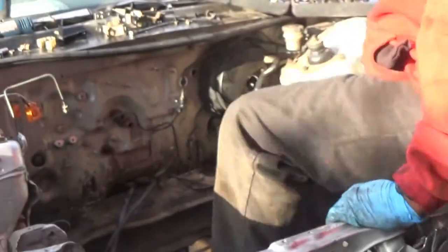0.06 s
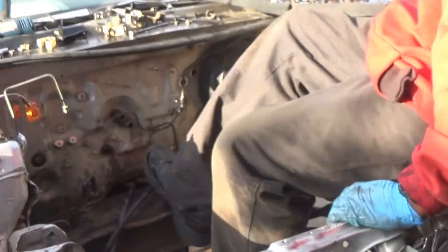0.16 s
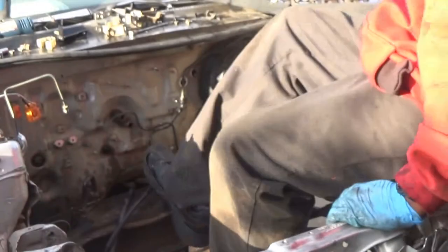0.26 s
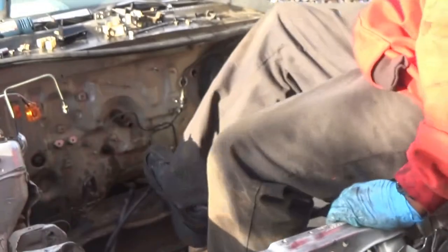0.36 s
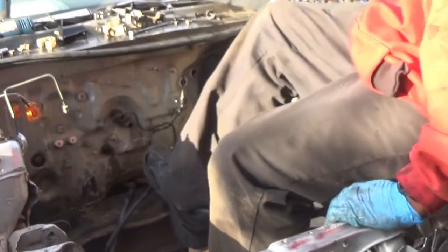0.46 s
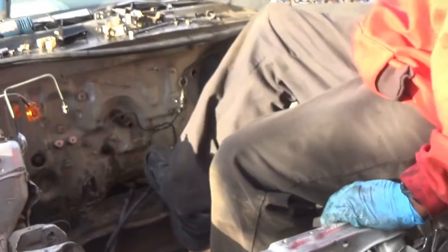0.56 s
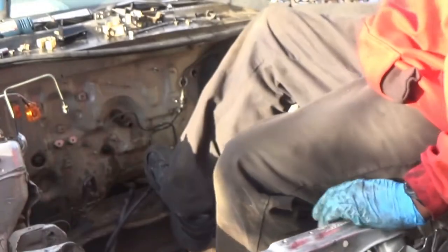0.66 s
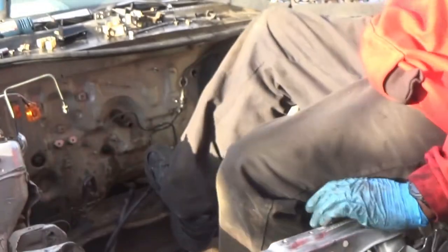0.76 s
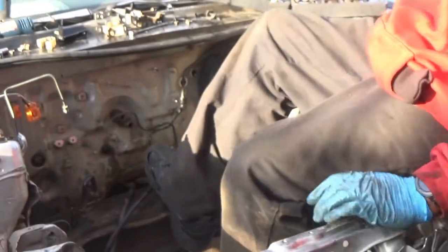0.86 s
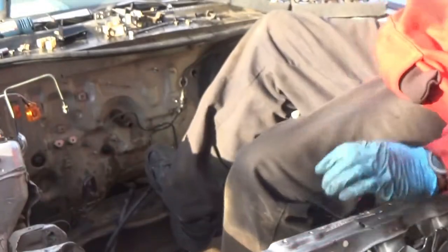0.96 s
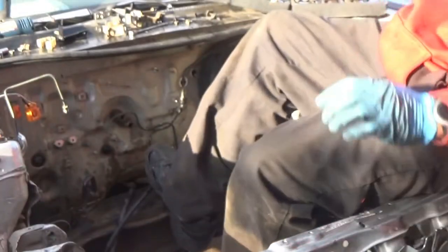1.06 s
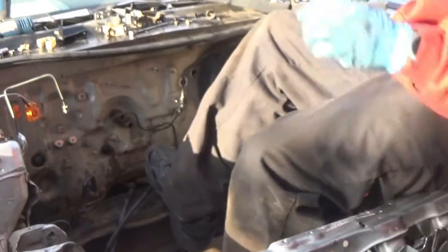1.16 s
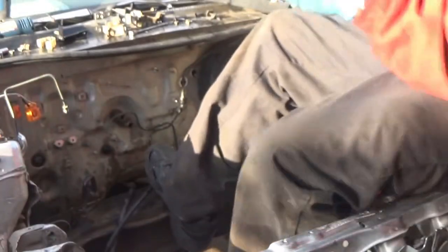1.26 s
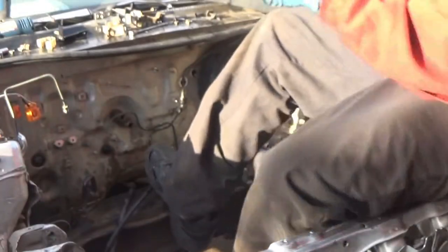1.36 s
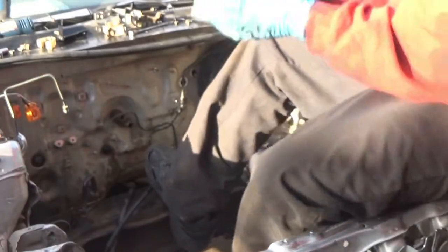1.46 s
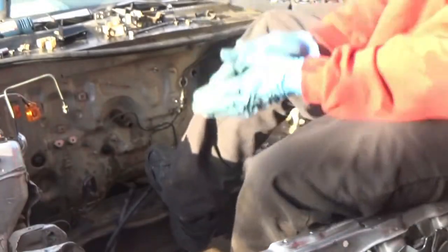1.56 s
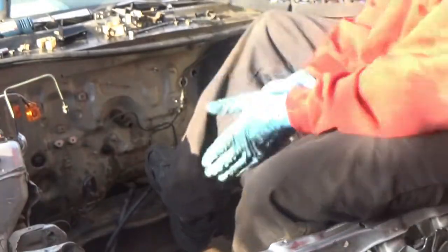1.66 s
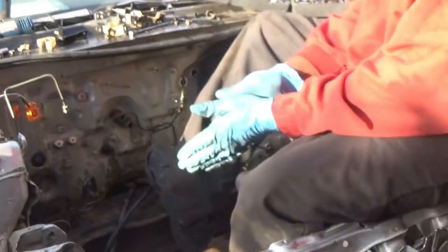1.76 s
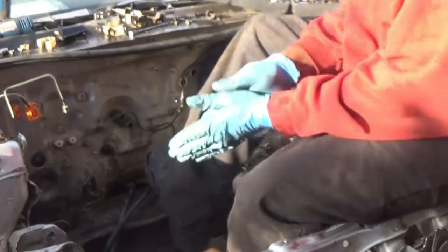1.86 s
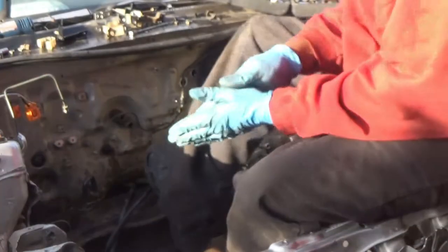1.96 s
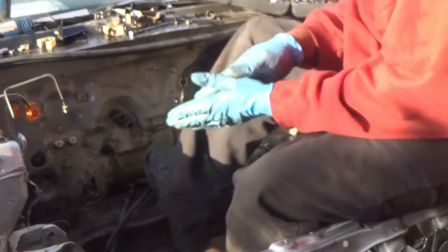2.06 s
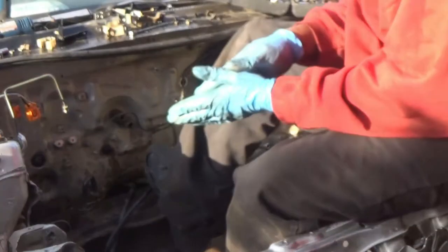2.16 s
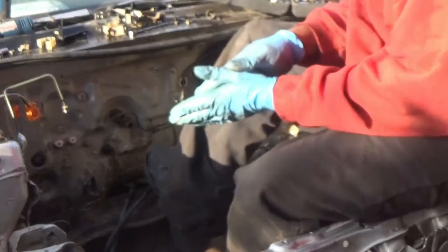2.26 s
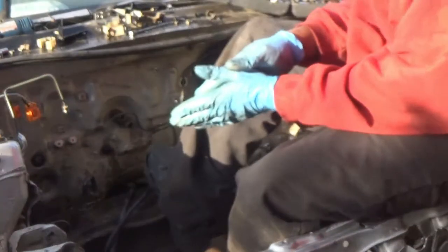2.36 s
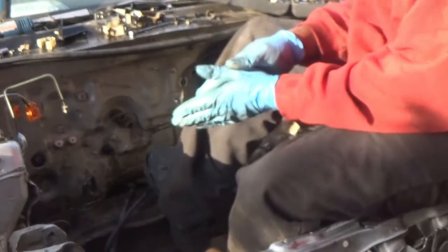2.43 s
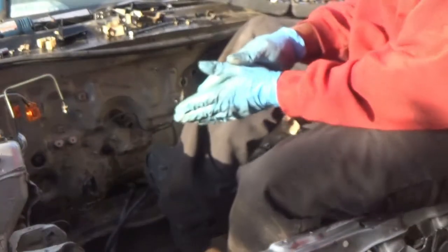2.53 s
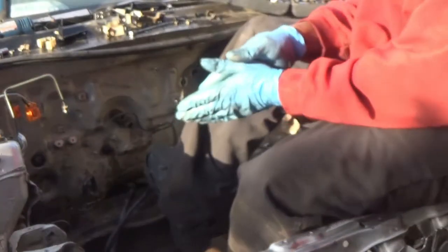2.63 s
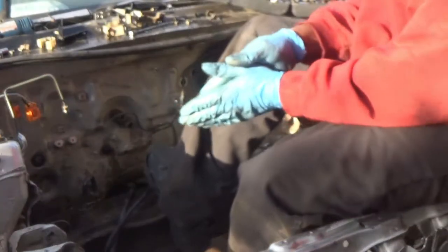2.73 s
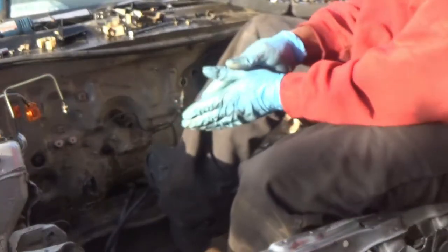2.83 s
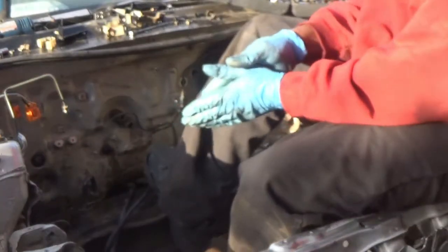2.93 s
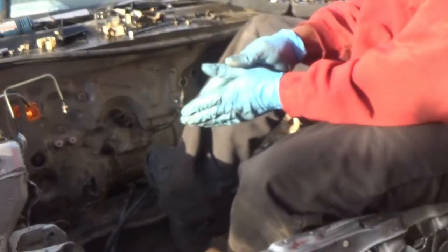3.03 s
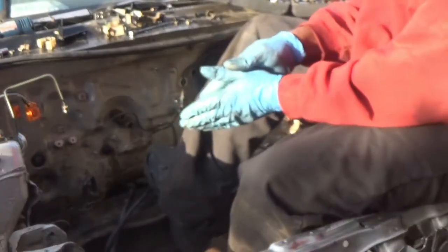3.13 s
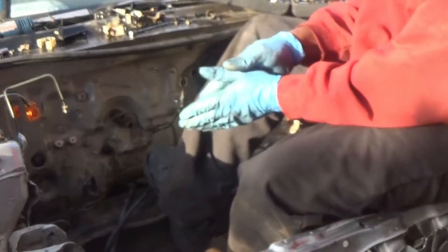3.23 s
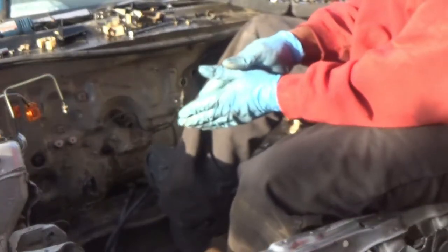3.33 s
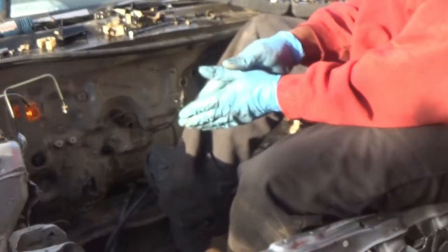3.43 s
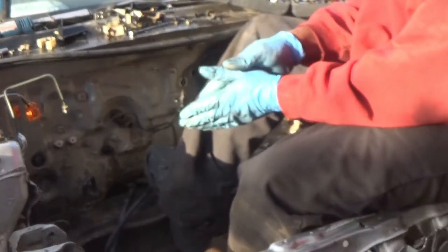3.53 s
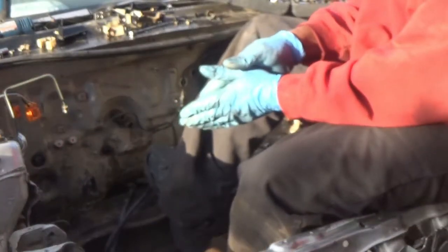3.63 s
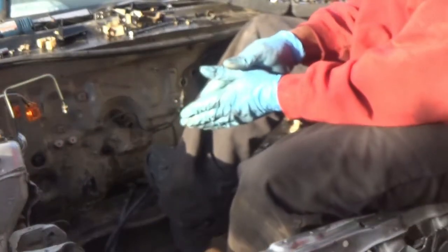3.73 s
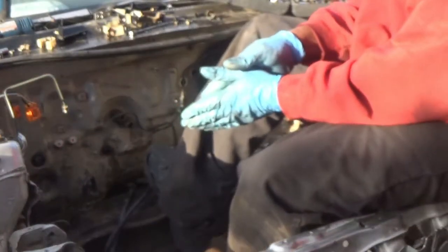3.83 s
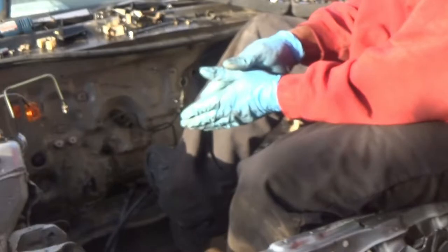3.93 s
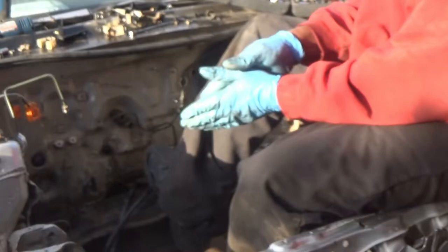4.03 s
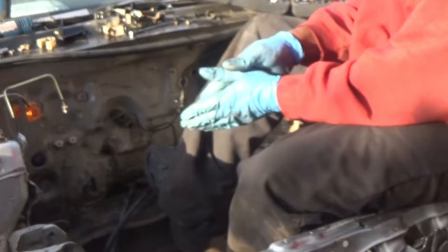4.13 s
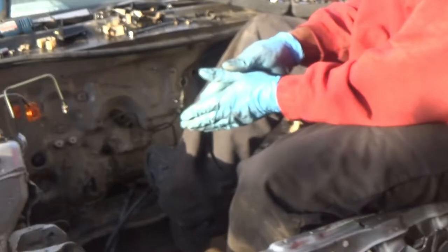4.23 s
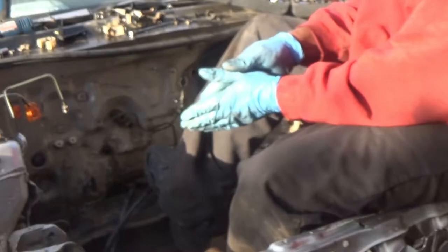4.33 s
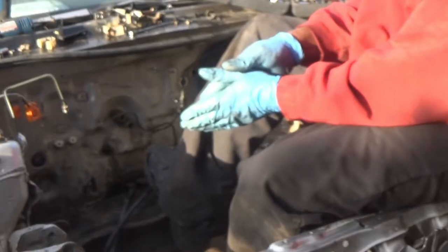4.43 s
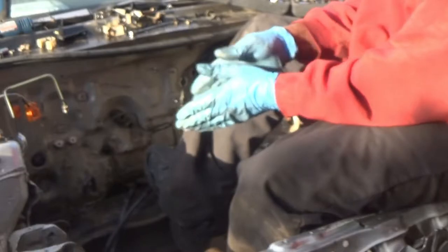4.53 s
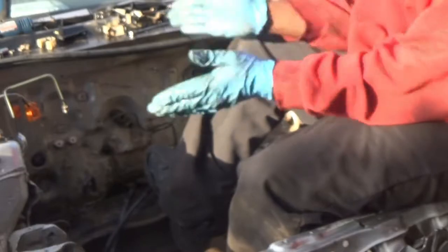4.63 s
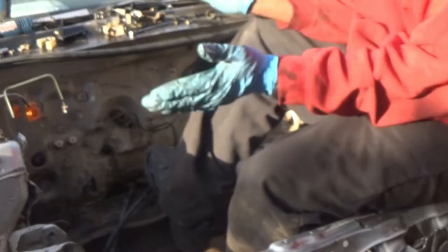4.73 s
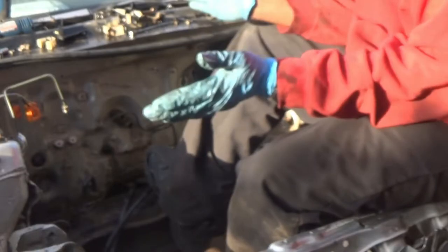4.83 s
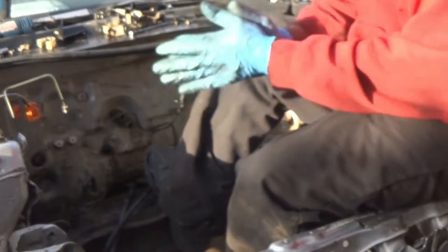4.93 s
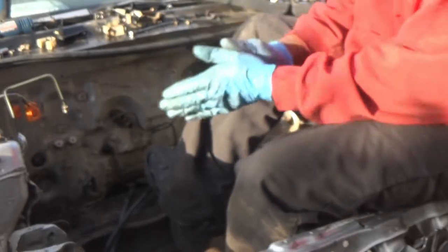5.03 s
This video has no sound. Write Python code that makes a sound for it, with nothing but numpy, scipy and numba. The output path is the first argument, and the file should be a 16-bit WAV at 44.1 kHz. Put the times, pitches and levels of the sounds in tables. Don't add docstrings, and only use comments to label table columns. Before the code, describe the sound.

After a very short silence, an outdoor yard cuts in: low distant hum, chirping birds and a faint fluttering lens-motor whine. Clothing and rubber gloves scuff close by for about two seconds, then nearly stop. A soft tug leads into sharp rubber cracks, followed by a single hard clap with a bright, rattling metallic tail, far louder than everything else.

```python
import sys
import numpy as np
from scipy import signal
from scipy.io import wavfile
from scipy.ndimage import uniform_filter1d
from numba import njit

SR = 44100
rng = np.random.default_rng(int(sys.argv[2]) if len(sys.argv) > 2 else 0)


def bounce(signal):
    frames = np.transpose(np.atleast_2d(signal))
    limited = np.clip(frames, -1, 1)
    pcm = np.round(limited * 32767).astype(np.int16)
    wavfile.write(sys.argv[1], SR, pcm)


def attenuation_scalar(level_db):
    decades = np.asarray(level_db, float) / 20
    return 10 ** decades


N = 224403


@njit
def svf(x, hz, width):
    y, b, l = np.empty(len(x)), 0., 0.
    g, k = np.tan(np.pi * hz / SR), width / hz
    for i in range(len(x)):
        v = (b + g * (x[i] - l)) / (1 + g * (g + k))
        b, l, y[i] = 2 * v - b, l + 2 * g * v, k * v
    return y


def band(x, hz, width):
    hz, width = float(hz), float(width)
    return svf(svf(x, hz, width), hz, width)


def unit(x):
    return x / np.sqrt(np.mean(x ** 2))


def at(table, hz):
    f, v = np.transpose(table)
    return np.interp(np.log(hz), np.log(f), v)


def walk(rate_hz):
    k = int(SR / rate_hz)
    steps = np.repeat(rng.standard_normal(N // k + 1), k)
    return 1.195 * uniform_filter1d(uniform_filter1d(steps, k), k)[:N]


def add(out, s, x, pan_db):
    i = int(s * SR)
    x = x[:N - i]
    out[:, i:i + len(x)] += x * attenuation_scalar(np.array([[pan_db], [-pan_db]]) / 2)


def burst(db, hz, width, t60):
    t = np.arange(4096) / SR
    puff = rng.standard_normal(len(t)) * 1000. ** (-t / t60)
    x = band(puff, min(hz, .4 * SR), 1.6 * width)
    return attenuation_scalar(db) * x / abs(x).max()


def spread(x, side_db):
    smear = uniform_filter1d(rng.standard_normal(600), size=3) * np.exp(-np.arange(600) / 150)
    side = signal.fftconvolve(x, smear / np.linalg.norm(smear))[:N] * attenuation_scalar(side_db)
    return np.array([x + side, x - side])


def effort(moves, hz):
    t = np.arange(N) / SR
    power = 0
    for s, rise, fall, db, tilt in moves:
        below_db = 10 * np.maximum((s - t) / rise, (t - s) / fall)
        power = power + attenuation_scalar(db + tilt * np.log2(hz / 2500) - below_db) ** 2
    return power


# f/Hz, width/Hz
SURFACES = [(750, 1000), (2500, 1870), (5000, 2100), (10500, 4900)]
# peak t/s, rise/s, fall/s, level/dB, brightness/(dB/octave)
SHIFTS = [(.235, 0.019, .03, -56, -1.5), (.342, 0.041, 0.044, -49.5, 0), (.418, .03, 0.044, -48.5, -2.5),
          (.68, .07, 0.18, -55, 0), (.934, .05, .06, -57.5, 1), (1.18, 0.15, 0.054, -60.5, 1.5),
          (1.256, .08, 0.1, -51.5, 0), (1.37, .05, .06, -57.5, -0.5), (1.466, .02, 0.098, -54.5, -0.5),
          (1.606, 0.11, 0.07, -53, 0.5), (1.75, 0.058, 0.084, -51.5, 0), (1.9, .05, 0.088, -59.5, -1),
          (2.03, .08, .04, -60.5, 1), (2.14, .03, .012, -64, -0.5)]
SHIFT_DB = (0, -9, -4, -7)
# peak t/s, rise/s, fall/s, level/dB, brightness/(dB/octave)
RUBS = [
    (.38, .08, 0.094, -52, 2),
    (1.1, 0.13, .08, -61.5, -3),
    (1.256, .05, .07, -47.5, 3),
    (1.48, 0.023, .04, -55, -3),
    (1.606, 0.087, 0.07, -41.5, -2),
]
RUB_DB = (-18, 0, -21, -16)
# t/s, peak level/dB, f/Hz, left minus right/dB
TICKS = [(0.245, -44, 8000, 5), (0.346, -43, 1810, 0), (.42, -48, 1900, -6), (0.618, -44.5, 1850, 3),
         (1.23, -34, 2800, -3), (1.3185, -36.5, 10000, 3), (1.324, -39, 10000, 0), (1.337, -42, 9000, 0),
         (1.46, -47, 5000, 0), (1.511, -44, 11000, 0), (1.6, -34, 11100, -1), (1.643, -54, 11000, 0),
         (2.257, -51, 6500, 0), (2.508, -43, 2370, 2), (2.515, -52, 3780, 0), (2.53, -48, 2780, 3),
         (2.601, -54, 4100, 0), (4.325, -56, 3000, 0)]


def rustle():
    sizes = attenuation_scalar(1.5 * rng.exponential(size=N))
    grit = sizes * (rng.random(N) < .3) * attenuation_scalar(1.5 * walk(60.))
    out = 0
    for (hz, width), shift_db, rub_db in zip(SURFACES, SHIFT_DB, RUB_DB):
        grains = unit(band(grit * rng.standard_normal(N), hz, 1.55 * width))
        power = attenuation_scalar(2 * shift_db) * effort(SHIFTS, hz) + attenuation_scalar(2 * rub_db) * effort(RUBS, hz)
        out = out + grains * np.sqrt(power)
    rubbed = spread(out, side_db=-14) * attenuation_scalar(np.array([[.22], [-.22]]))
    for s, db, hz, pan_db in TICKS:
        add(rubbed, s, burst(db, hz, 0.49 * hz, t60=min(.03, 40 / hz)), pan_db)
    return rubbed


# t/s, length/s, level/dB, f/Hz, width/Hz
SWISHES = [(1.511, .15, -44.5, 3260, 2200), (1.449, 0.31, -57.5, 376, 250), (.3, 0.19, -59, 280, 200),
           (2.1, .6, -80, 9000, 9000), (2.265, 0.066, -64.5, 5300, 1500), (2.492, 0.075, -57, 2900, 2500),
           (2.564, .1, -64, 4150, 1200), (2.893, 0.093, -60.5, 5000, 2200), (3.865, 0.075, -65, 5200, 1800),
           (4.343, 0.045, -53, 3540, 2500), (4.58, 0.11, -58, 4770, 2200), (4.798, 0.27, -65, 5500, 6000)]


def swish():
    out = np.zeros((2, N))
    for s, length_s, db, hz, width in SWISHES:
        n = int(length_s * SR)
        brush = band(rng.standard_normal(n), hz, 0.83 * width)
        add(out, s, attenuation_scalar(db) * unit(brush) * np.hanning(n), 0)
    return spread(out[0], side_db=-15.5)


# level/dB, f/Hz, width/Hz
TUG = [(-41.5, 3000, 1300), (-39, 2770, 500), (-44.5, 4000, 1100), (-52, 7100, 2100)]
# t/s, peak level/dB, f/Hz
CRACKS = [(4.5011, -39, 8000), (4.5035, -30, 5500), (4.5067, -21, 6460), (4.5085, -20.5, 10550),
          (4.5093, -16.5, 5200), (4.5107, -17, 5000), (4.511, -20, 8500), (4.5152, -21, 8600),
          (4.518, -23, 4960), (4.5206, -30, 6000)]
# level/dB, f/Hz, width/Hz, t60/s
SNAP = [(-36.5, 1040, 760, 0.19), (-34.5, 2250, 1000, 0.075), (-33.5, 5800, 6000, .19)]


def snap():
    out = np.zeros((2, N))
    for k, part in enumerate(TUG):
        add(out, 4.345 + k * 0.0044, burst(*part, t60=0.074), 0)
    for s, db, hz in CRACKS:
        add(out, s, burst(db, hz, 0.43 * hz, t60=.016), 0)
    for part in SNAP:
        add(out, 4.51, burst(*part), 0)
    return spread(out[0], side_db=-16.5) * attenuation_scalar(np.array([[-.6], [.6]]))


# t/s, peak level/dB, cupped palm over flat fingers/dB, left minus right/dB
CLAP = [(4.9407, -23, 0, -5), (4.9421, -10, 11, 3.5), (4.9433, -9, -9.5, 3), (4.945, -19, 7, 1),
        (4.948, -8, -8, -4), (4.9493, -8, -17, -1), (4.9544, -16, -8, -1), (4.9561, -12, -8, 4),
        (4.9615, -20, 0, 0), (4.967, -13, 19, -3), (4.969, -12, -22, 1), (4.976, -27, -2, -1),
        (4.986, -16, 10, -3), (4.9904, -15, -1, -6), (5.002, -18.5, 1, -1), (5.012, -16, 11, -8),
        (5.027, -20.5, 8, -6)]
# f/Hz, width/Hz, t60/s
PALM = [(1900, 1270, 0.011), (4700, 980, 0.0077), (9500, 1900, 0.0041)]
# t/s, level/dB
FIRST_CRACK = (4.9434, -11)
# f/Hz, level/(dB per Hz)
BAY = [(59, -57), (100, -39), (189, -3), (442, -13.5), (836, 0.5), (930, -5), (1250, -13), (1650, 3),
       (3540, -9.5), (4570, 2.5), (6150, -27), (7450, -11.5), (10700, -20), (15000, -41), (16000, -67)]
# f/Hz, t60/s
BAY_T60 = [(150, 0.17), (700, 0.28), (2000, 0.33), (5000, 0.29), (12000, 0.24)]
# f/Hz, rise/s
BAY_RISE = [(150, 0.042), (700, 0.018), (2000, 0.0097), (5000, 0.0067), (12000, 0.0025)]
# f/Hz, level/dB, t60/s
PANELS = [(854, -9, 0.42), (1173, -13, 0.57), (1667, -1, 0.31), (1950, -18, 0.31), (2376, -16, 0.27),
          (3262, -22, 0.72), (3640, -17, 0.29), (3950, -26, 0.69), (4100, -4.5, 0.32), (4900, -7, 0.23),
          (5000, -18, 0.25), (5230, -1, 0.23), (7305, -15, 0.19), (7640, -11, 0.22)]


def clap():
    out = np.zeros((2, N))
    for s, peak_db, cup_db, pan_db in CLAP:
        palm_db = peak_db + min(cup_db, 0)
        fingers_db = peak_db - max(cup_db, 0)
        crack_db = peak_db - 13 - 100 * (s - CLAP[0][0])
        for db, part in zip((palm_db, fingers_db, crack_db), PALM):
            add(out, s, burst(db, *part), pan_db)
    add(out, FIRST_CRACK[0], burst(FIRST_CRACK[1], *PALM[-1]), 2)

    i = int(CLAP[1][0] * SR)
    t = np.arange(N - i) / SR
    mid, side = 0, 0
    for hz in 120 * 2 ** np.arange(0, 7.1, 1 / 3):
        rise = 1 - np.exp(-t / at(BAY_RISE, hz))
        shape = rise * 1000. ** (-t / at(BAY_T60, hz)) * attenuation_scalar(at(BAY, hz))
        mid = mid + shape * band(rng.standard_normal(len(t)), hz, hz / 3)
        side = side + shape * band(rng.standard_normal(len(t)), hz, hz / 3)
    for hz, db, t60 in PANELS:
        shape = (1 - np.exp(-t / .008)) * 1000. ** (-t / t60)
        mid = mid + attenuation_scalar(db - 21.5) * shape * np.sin(2 * np.pi * (hz * t + rng.random()))
    side = side * attenuation_scalar(-7.5) * (1 - np.exp(-t / 0.015))
    out[:, i:] += attenuation_scalar(-7.5) * np.array([attenuation_scalar(2.5) * (mid + side), attenuation_scalar(3.9) * (mid - side)])
    return out


def sing(note, wobble, rough):
    s, hz, db = np.transpose(note)
    t = np.arange(s[0], s[-1], 1 / SR)
    jitter = uniform_filter1d(rng.standard_normal(len(t)), 40)
    pitch_hz = uniform_filter1d(np.interp(t, s, hz), 90) * (1 + wobble * jitter)
    ends = np.clip(np.minimum(t - s[0], s[-1] - t) / 0.0013, 0, 1)
    grains = unit(uniform_filter1d(uniform_filter1d(rng.standard_normal(len(t)), size=50), size=50))
    flutter = 1 - rough + rough * grains
    tone = np.sin(2 * np.pi * np.cumsum(pitch_hz) / SR)
    return np.sqrt(2) * attenuation_scalar(np.interp(t, s, db)) * ends * flutter * tone


def falling(s, top_hz, fall_s, end_hz, db, ends_db):
    peak = .35
    peak_hz = .95 * top_hz * (end_hz / top_hz) ** peak
    return [(s, top_hz, db + ends_db[0]), (s + peak * fall_s, peak_hz, db), (s + fall_s, end_hz, db + ends_db[1])]


# top t/s, top f/Hz, level/dB
CHIPS = [(.245, 4340, -48), (.828, 4190, -44), (2.18, 4370, -62), (2.32, 4500, -57), (2.36, 4240, -51),
         (3.072, 4290, -52), (4.017, 4300, -53.5)]
# t from top/s, share of top f, level/dB
CHIP = [(-.023, .62, -8), (-.008, .9, 0.5), (0, 1, -6), (.006, .84, -4), (.015, .66, -6)]
# top t/s, top f/Hz, level/dB
PEEPS = [(4.215, 2410, -58), (4.295, 2470, -66), (4.452, 2345, -53.5)]
# t from top/s, share of top f, level/dB
PEEP = [(-.016, .91, -5), (0, 0.98, 0), (.016, .91, -10)]
# top t/s, top f/Hz, fall/s, end f/Hz, level/dB
CHEEPS = [(.735, 4390, .045, 3060, -54.5), (2.132, 5000, .03, 3450, -53), (2.273, 4700, .042, 2650, -56),
          (3.925, 4470, 0.062, 2340, -58)]
# t/s, top f/Hz, fall/s, end f/Hz, level/dB
SLIDES = [(.595, 7000, .02, 6000, -59), (1.06, 3900, 0.052, 3200, -58), (2.172, 3460, .068, 3150, -50),
          (2.94, 4100, .075, 2250, -50), (2.325, 2150, .018, 2600, -58), (4.63, 3850, .08, 2283, -50.5)]


def notes():
    lines = []
    for calls, shape in ((CHIPS, CHIP), (PEEPS, PEEP)):
        for s, hz, db in calls:
            lines.append([(s + ds, hz * share, db + d) for ds, share, d in shape])
    for cheep in CHEEPS:
        s, top_hz, db = cheep[0], cheep[1], cheep[-1]
        flick = (s - .017, .72 * top_hz, db - 4)
        lines.append([flick] + falling(*cheep, ends_db=(-5, -1)))
    for slide in SLIDES:
        lines.append(falling(*slide, ends_db=(-4, -8)))
    return lines


# t/s, level/dB
TRILL = [(2.7, -61.5), (2.75, -77), (2.81, -58.5), (2.94, -51.5), (3.07, -57.5), (3.19, -58), (3.31, -56.5),
         (3.42, -61), (3.455, -58), (3.53, -63), (3.14, -65), (3.29, -62.5)]
# t/s, f/Hz, level/dB
TONES = [
    [(2.62, 470, -68), (2.7, 485, -56.5), (2.78, 480, -75)],
    [(3.05, 480, -66), (3.3, 475, -65.5), (3.55, 465, -66)],
    [(4.1, 470, -66), (4.22, 460, -61), (4.32, 450, -69)],
    [(3.2, 2280, -88), (3.4, 2280, -70), (3.52, 2290, -71)],
    [(4.66, 1430, -69), (4.75, 1450, -63), (4.85, 1475, -58.5), (4.94, 1490, -63)],
]


def birds():
    out = np.zeros((2, N))
    for note in notes():
        hoarse = note[-1][0] - note[0][0] > .043
        wobble, rough = (.07, .55) if hoarse else (.03, .22)
        add(out, note[0][0], sing(note, wobble, rough), 1.0)
    for s, db in TRILL:
        note = [(s, 3850, db - 4), (s + .055, 3520, db)]
        add(out, s, sing(note, .045, .33), 1.0)
    t = np.arange(int(.25 * SR)) / SR
    yard = rng.standard_normal((3, len(t))) * 1000. ** (-t / .22) * (t > .008)
    yard = (yard[0] + 0.88 * yard[1:]) / np.linalg.norm(yard[0])
    out = out + attenuation_scalar(-5.5) * signal.fftconvolve(out, yard, axes=1)[:, :N]
    for tone in TONES:
        add(out, tone[0][0], sing(tone, .02, .15), 0)
    return out


# t/s, f/Hz, level/dB
MOTOR = [(.2, 2880, -61), (1.75, 2886, -59.5), (1.951, 2682, -67), (2.05, 3060, -64), (2.55, 3090, -61),
         (2.8, 3090, -63.5), (3.4, 3078, -64.5), (5.09, 3050, -64.5)]
# t/s, level/dB
MOTOR_TICK = [(.2, -82), (2.0, -80), (2.3, -75), (5.09, -74)]


def motor():
    frame_hz = 29.96
    t = np.arange(N) / SR
    s, *columns = np.transpose(MOTOR)
    hz, db = (np.interp(t, s, c) for c in columns)
    frame = (frame_hz * t - .61) % 1
    gate = uniform_filter1d(1. * (frame < .48), 60) * attenuation_scalar(1.6 * walk(frame_hz) - 1)
    turn = 2 * np.pi * np.cumsum(hz * (1 + .014 * walk(300.))) / SR
    whine = np.sin(turn) + attenuation_scalar(-17) * np.sin(2 * turn) + attenuation_scalar(-19) * np.sin(3 * turn)
    knock = np.exp(-frame / .1) * rng.standard_normal(N)
    tick = unit(band(knock, 4500, 1300)) + attenuation_scalar(-5) * unit(svf(knock, 2900., 1500.))
    tick = attenuation_scalar(np.interp(t, *np.transpose(MOTOR_TICK))) * tick
    return spread(np.sqrt(2) * attenuation_scalar(db) * gate * whine + tick, side_db=-10.5)


# f/Hz, level/(dB per Hz)
TOWN = [(20, -10), (45, -6), (90, 0.5), (160, -3.5), (250, -6.5), (380, -9.5), (600, -9), (1100, -11.5),
        (1600, -17.5), (2900, -19), (4400, -27), (8000, -32), (12500, -37), (16000, -44)]
# f/Hz, side minus mid/dB
TOWN_SIDE = [(60, -26), (110, -27), (200, -16), (380, -10), (700, -9), (1290, -5.5), (2380, -7), (4400, -8),
             (8120, -12), (15000, -21)]
# t/s, level/dB
TOWN_DB = [(.2, -53), (1.2, -53), (2.4, -53.5), (3.0, -53.5), (3.7, -55), (5.09, -52.5)]


def town():
    out, swell = 0, walk(0.42)
    left_right = np.array([[1], [-1]])
    for hz in 25 * 2 ** np.arange(0, 9.4, 1 / 3):
        width = hz / 3 * (1 + (hz / 11000) ** 2)
        mid, side = (band(rng.standard_normal(N), hz, width) for _ in range(2))
        distant = min(1., 600 / hz)
        flicker_db = .25 * swell + .8 * walk(6.)
        db = at(TOWN, hz) + distant * flicker_db
        lean_db = min(.5, hz / 2000) * left_right
        out = out + attenuation_scalar(db + lean_db) * (mid + attenuation_scalar(at(TOWN_SIDE, hz)) * side * left_right)
    return unit(out) * attenuation_scalar(np.interp(np.arange(N) / SR, *np.transpose(TOWN_DB)))


def scene():
    near = rustle() + swish() + snap() + clap()
    near = signal.sosfilt(signal.butter(2, 15500, fs=SR, output="sos"), near)
    return near + birds() + motor() + town()


def top_cut(x):
    return signal.sosfilt(signal.butter(12, 16530, fs=SR, output="sos"), x)


def record(dry):
    limit, start_s, fade_s, cut_hz = .62, .2163, 0.00073, 15900
    rounded = limit * np.tanh(dry / limit)
    kept = signal.sosfilt(signal.ellip(6, .3, 40, cut_hz, fs=SR, output="sos"), rounded)
    fade = np.clip((np.arange(N) / SR - start_s) / fade_s, 0, 1)
    return top_cut(kept * fade)


dry = scene()
out = record(dry)
bounce(out)
```